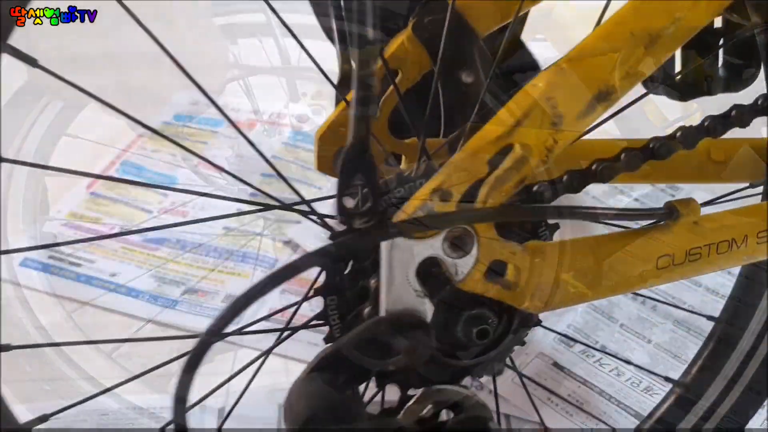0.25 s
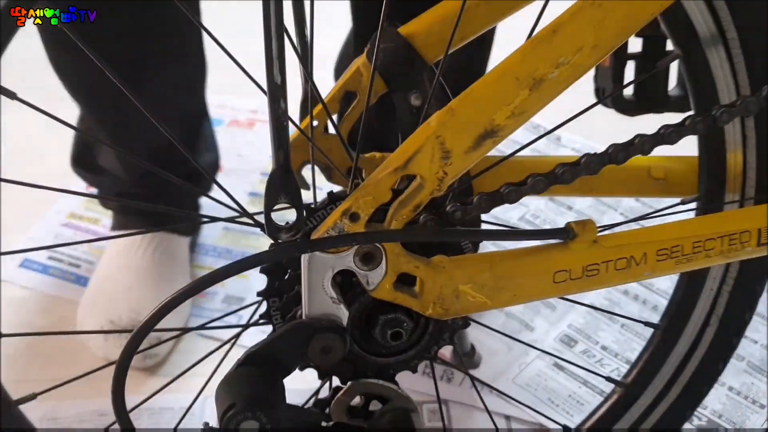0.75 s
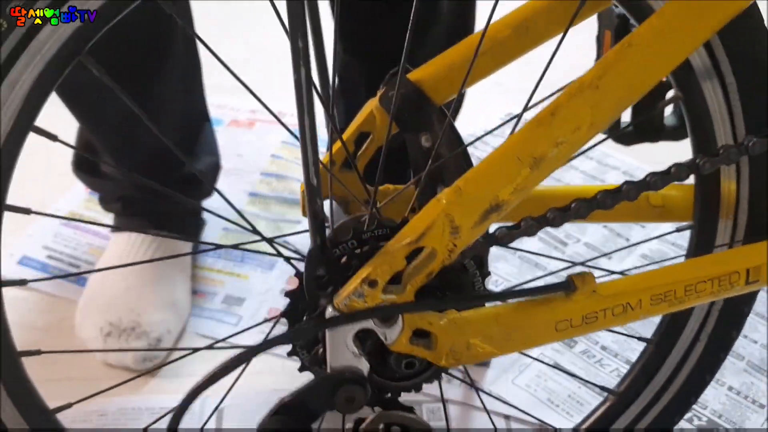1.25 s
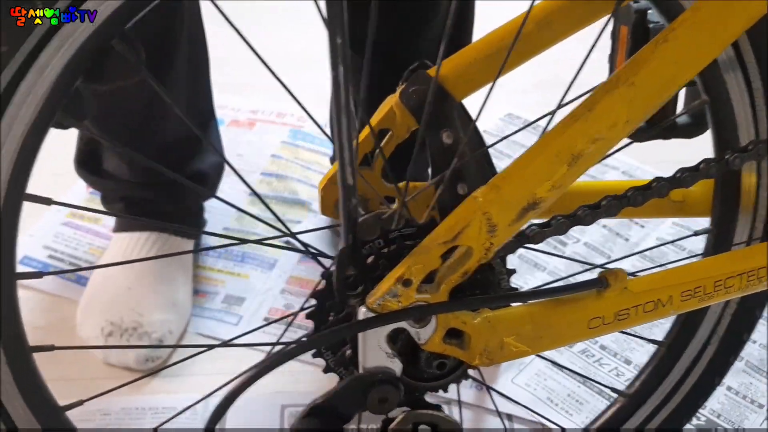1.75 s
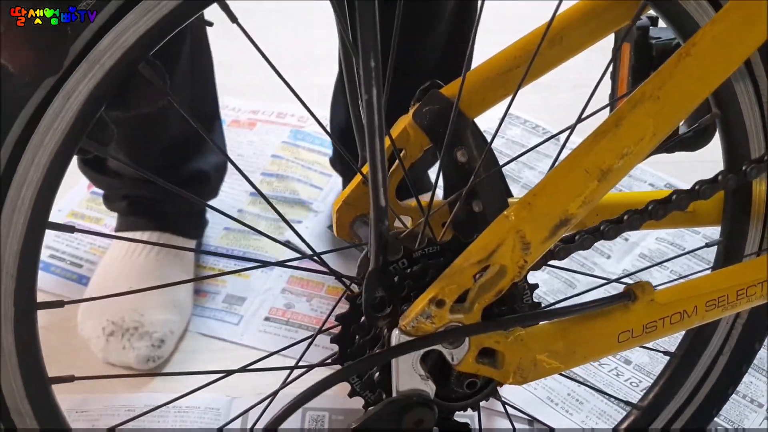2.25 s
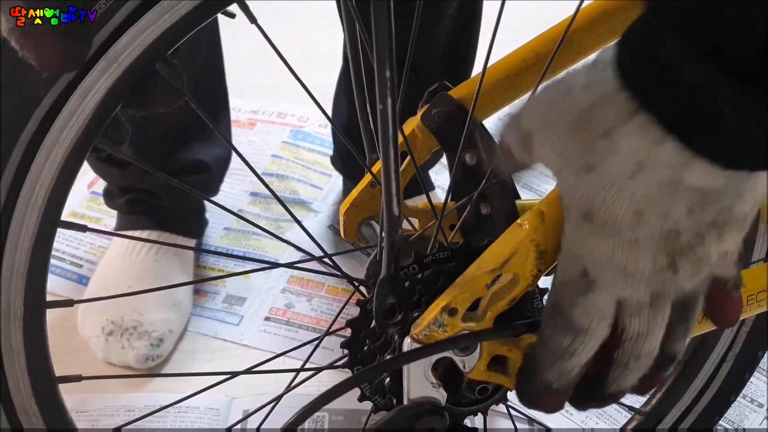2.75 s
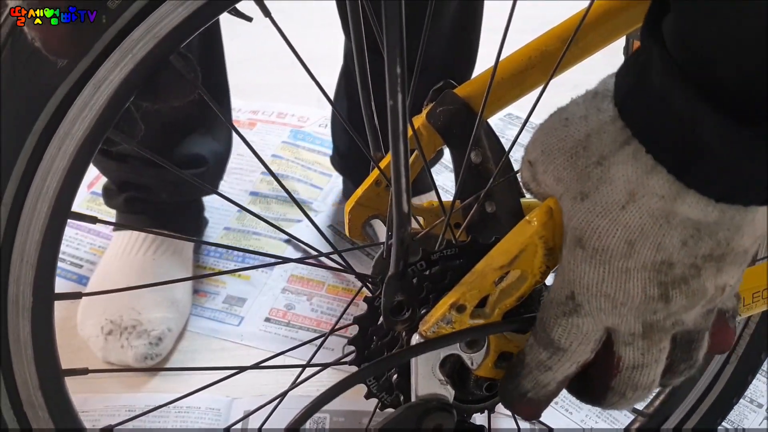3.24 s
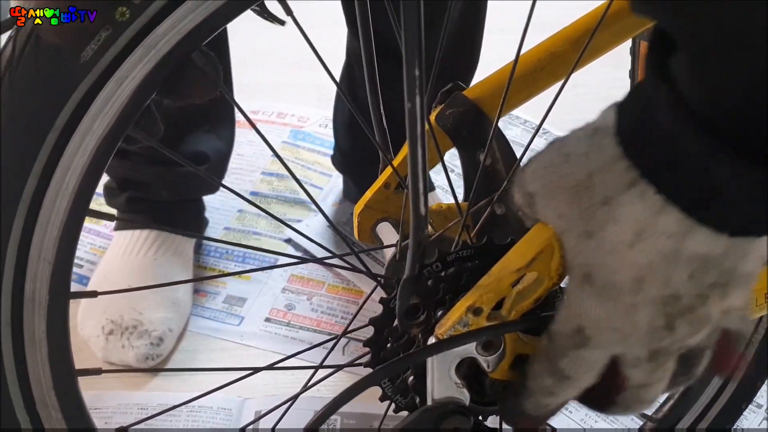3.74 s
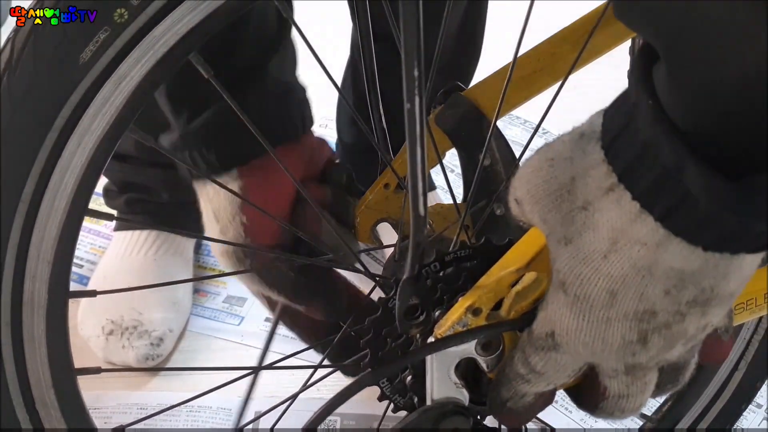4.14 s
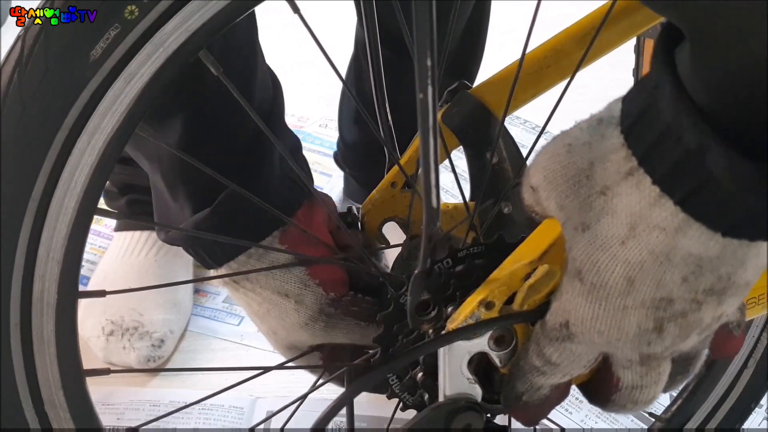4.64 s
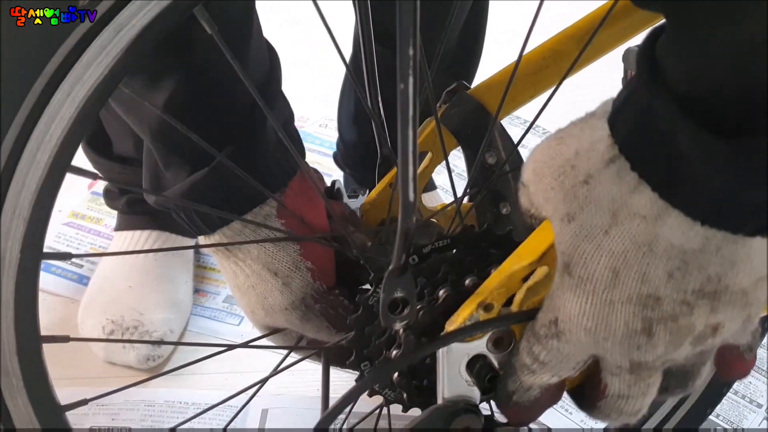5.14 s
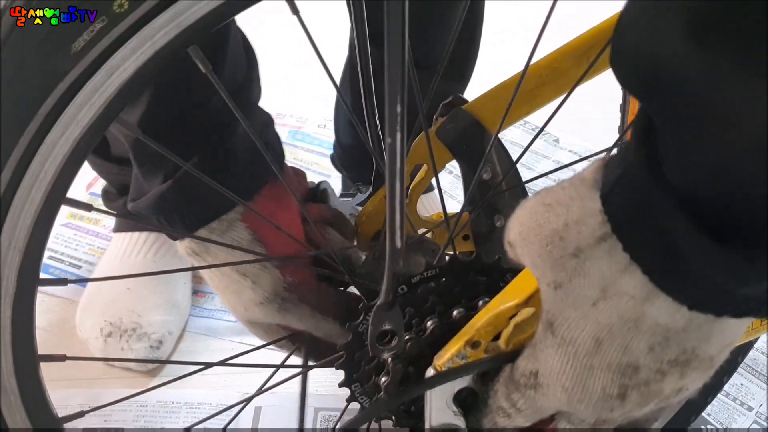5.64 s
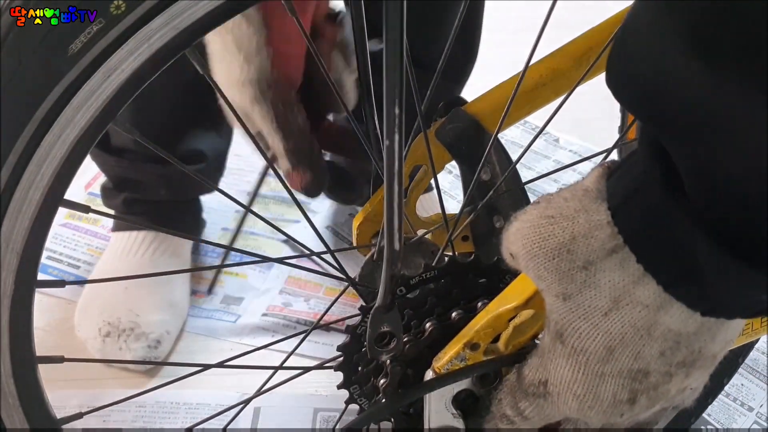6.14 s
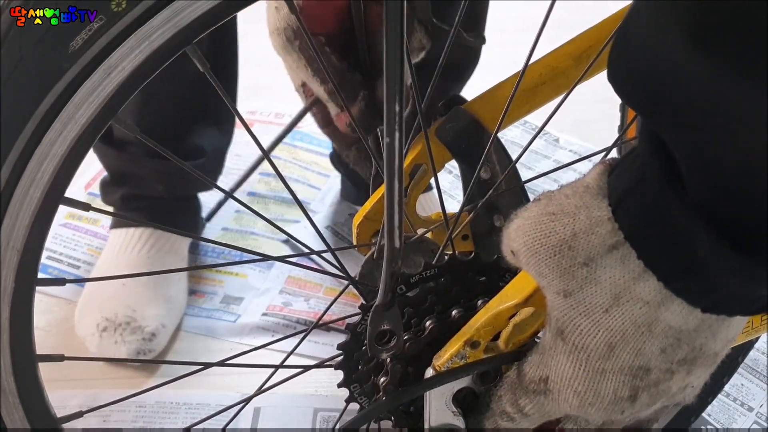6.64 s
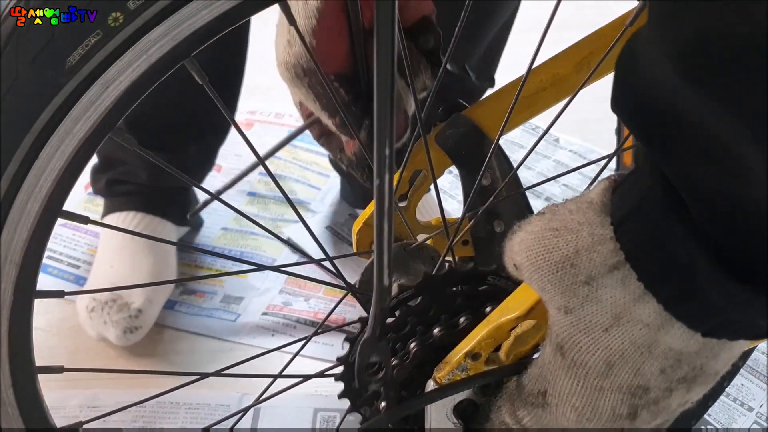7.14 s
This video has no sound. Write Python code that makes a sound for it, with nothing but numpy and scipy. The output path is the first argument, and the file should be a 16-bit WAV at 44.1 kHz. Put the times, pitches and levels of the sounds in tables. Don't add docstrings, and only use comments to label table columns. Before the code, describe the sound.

Close stereo microphone in a small, hard-floored, reverberant room. A sharp metal clack with a short squeak comes first, the loudest event. Then scattered small clicks, chain ticks and loose rattles over soft glove rubbing and dull tyre bumps. Around four and a half seconds a dull clunk and faint bell-like sprocket taps, then a bright snap past five seconds. It quietens, ending in light ticks.

```python
import sys
import numpy as np
from scipy import signal
from scipy.fft import rfft, irfft, next_fast_len
from scipy.io import wavfile

SR = 44100
rng = np.random.default_rng(int(sys.argv[2]) if len(sys.argv) > 2 else 0)


def int16_out(signal):
    q = np.round(np.clip(np.atleast_2d(signal).T, -1, 1) * 32767)
    wavfile.write(sys.argv[1], SR, q.astype(np.int16))


def ratio(d):
    e = np.asarray(d, float) / 20
    return 10 ** e


N = 325899
LONG = next_fast_len(N)

# t/s, level/dB, brightness/dB
FIDGET = [(0, -58.5, 4), (0.65, -68, -3), (0.73, -64.5, 2.5), (1.19, -72, 1.5), (1.63, -89.5, 10),
          (1.8, -58, 2), (2.2, -62.5, 1), (2.75, -65, -5), (3.15, -73, -4.5), (3.45, -65.5, -3),
          (3.85, -60, -5), (4.3, -69, 2), (5.68, -80.5, 1), (6.07, -67.5, -5), (6.4, -84, 5.5),
          (6.61, -71.5, -7.5), (6.9, -66, 0.5), (7.39, -70, -13.5)]
# t/s, peak/dB, attack/s, release/s, dullness/dB
STROKES = [(0.06, -54.5, 0.6, .3, -13), (0.2, -35, 0.06, 0.2, -6), (0.99, -52.5, 0.053, 0.16, -12),
           (1.09, -65, 0.042, 0.13, 9), (1.339, -56, 0.27, 0.6, -4.5), (1.54, -54.5, 0.066, 0.064, 7.5),
           (1.93, -54.5, 0.083, 0.29, -1), (2.9, -62, 0.22, 0.24, -14), (3.29, -58, .15, 0.25, -10),
           (4.545, -50, .02, .04, -20), (4.53, -56, 0.27, 0.35, 0.5), (4.65, -43.5, 0.18, 0.074, -16),
           (4.79, -48.5, 0.32, 0.28, -6), (4.87, -45, 0.14, 0.1, -0.5), (5.17, -57.5, 0.057, 0.64, 1),
           (5.319, -43.5, 0.046, 0.12, -7.5), (5.388, -37.5, 0.13, 0.13, -31), (5.52, -58, .2, 0.27, -28),
           (7.199, -56.5, 0.083, 0.38, -4.5)]
# f/Hz, density/dB per Hz
RUB_COLOUR = [(88, -32), (150, 1), (197, -6.5), (249, 0), (328, -2), (774, -2), (941, -5.5), (3620, -4.5),
              (7920, -17), (9260, -15), (12700, -19.5), (15100, -25), (16000, -34.5)]
# t/s, level/dB
RUMBLE = [(0, -72), (0.35, -68), (1.05, -82), (1.25, -75), (2.02, -68), (2.53, -73.5), (3.27, -76.5),
          (3.62, -66), (4.2, -75.5), (4.75, -71), (4.95, -80.5), (5.18, -69), (5.43, -59), (5.58, -81),
          (6.3, -73), (6.48, -78), (6.89, -71), (7.39, -76)]
# f/Hz, density/dB per Hz
RUMBLE_COLOUR = [(12, -52.5), (20, -19.5), (76, -4.5), (97, -11), (128, -23.5), (162, -20.5), (198, -29.5),
                 (311, -21.5), (400, -24), (520, -35), (880, -120)]
# f/Hz, density/dB per Hz
HISS_COLOUR = [(120, -39.5), (200, -5.5), (232, -6.5), (328, -11), (366, 0), (387, -17), (519, -19.5),
               (683, -7), (1150, -20.5), (1600, -12.5), (2150, -24.5), (5130, -28.5), (16000, -31.5)]
# f/Hz, likeness/0-1
LIKENESS = [(60, 1), (180, 1), (550, 0.54), (1650, 0.9), (4970, 0.08), (15000, 0.0)]
# t/s, peak/dB, f/Hz, sparkle/dB
TICKS = [(0.002, -40, 1950, -20), (0.459, -81, 5900, 21), (0.512, -59, 1130, -2), (0.857, -40, 3480, -35),
         (0.956, -44.5, 1030, -19), (1.729, -41.5, 1790, -17.5), (1.738, -69, 4500, -10),
         (1.829, -46, 1510, -14), (1.927, -36.5, 3630, -38), (2.245, -41, 2970, -15.5),
         (2.292, -39, 2570, -13), (2.303, -33.5, 2580, -18.5), (3.238, -46, 3480, -12),
         (3.249, -40, 5540, -21), (3.426, -41.5, 2310, -36), (3.537, -47, 3780, -14),
         (3.671, -36, 5260, -23), (3.743, -33.5, 3800, -19), (3.838, -39, 3060, -18.5),
         (4.433, -33, 1120, -4.5), (4.64, -34, 2340, -9.5), (5.265, -39, 2880, -36),
         (5.286, -38, 5070, -25.5), (5.325, -22, 2670, -15), (6.875, -39, 4950, -47),
         (7.14, -53.5, 4300, 2), (7.1585, -40, 5000, -1.5), (7.1657, -42, 5520, -2.5),
         (7.2695, -38, 5450, -2.5)]
# t/s, peak/dB, f/Hz, sparkle/dB, chatter t60/s
RATTLES = [(0.1405, -18, 2100, -12, 0.19), (0.995, -39.5, 1600, -36.5, 0.05),
           (1.308, -36, 900, -17.5, 0.044), (1.944, -34, 2420, -13.5, 0.26), (1.958, -29, 4860, -13.5, 0.1),
           (2.029, -30.5, 3460, -17, 0.028), (2.213, -45.5, 2240, -13, 0.19),
           (2.824, -39.5, 2810, -16, 0.13), (3.52, -33.5, 2360, -18.5, 0.6),
           (5.306, -33.5, 2220, -39, 0.06), (7.181, -35, 2000, -22.5, 0.08)]
# t/s, peak/dB, f/Hz, sparkle/dB
CLICKS = [(0.1425, -8.5, 2900, -23), (0.148, -13, 3700, -19), (1.039, -60.5, 1060, 6),
          (1.138, -44, 1620, -27), (1.418, -43, 1800, -39), (1.532, -33, 5600, -14),
          (1.773, -38.5, 2900, -13), (1.854, -39.5, 1540, -16), (2.007, -33.5, 2200, -30),
          (2.146, -45, 3870, -27), (2.192, -41, 3930, -20), (2.805, -46, 1700, -11),
          (2.95, -41.5, 1810, -32.5), (3.299, -52, 2360, -13), (3.595, -33, 2970, -16),
          (4.529, -34.5, 5040, -2), (4.715, -38, 1700, -5.5), (4.733, -29, 1910, -14.5),
          (5.157, -48, 1540, -22), (5.169, -34.5, 2750, -42), (5.353, -23.5, 2650, -11.5),
          (5.437, -29, 1740, -37), (5.76, -61, 1990, -10), (6.967, -54, 3590, -18)]
# t/s, peak/dB, f/Hz, sparkle/dB
KNOCKS = [(0.704, -47.5, 1500, -29.5), (1.068, -28.5, 1300, -12.5), (1.274, -43.5, 1470, -15),
          (1.516, -33, 695, -32), (3.199, -51, 3180, -31), (3.503, -24.5, 3360, -47),
          (4.86, -34.5, 686, -27), (4.874, -22.5, 2580, -16.5), (4.877, -39.5, 575, -38),
          (5.41, -36.5, 333, -42.5), (5.428, -40.5, 365, -43.5), (7.238, -48, 5600, -8)]
# t/s, peak/dB, f/Hz, sparkle/dB, chatter t60/s
JINGLES = [(3.506, -31, 1280, -16.5, 0.62), (4.336, -40.5, 1250, 1, 0.1), (4.337, -33.5, 6200, -30, 0.044),
           (4.565, -14.5, 2230, -49, 0.034), (4.568, -21, 1200, -37, 0.032), (4.722, -33, 1950, -34, 0.064),
           (6.419, -58, 5284, -15, .063), (7.076, -47.5, 5850, -11, 0.075),
           (7.186, -33.5, 1110, -41, 0.028), (7.264, -43, 4960, -0.6, 0.016)]
# t/s, level/dB
SQUEAKS = [
    [(0.04, -66), (0.048, -52), (0.078, -35), (0.11, -94)],
    [(0.53, -63), (0.59, -54.5), (0.622, -110), (0.66, -89.5)],
]
# f/Hz, width/Hz, level/dB
SQUEAK_PEAKS = [
    [(1300, 300, -9), (1950, 200, -2), (3700, 890, -2)],
    [(1205, 420, -1.5), (2500, 230, -1.5), (3300, 190, -1.5)],
]
# t/s, peak/dB, f/Hz, t60/s, puff/dB
BUMPS = [(0.142, -41, 106, 0.31, -12), (1.003, -29.5, 57.4, 0.3, -16), (1.295, -47.5, 82, 0.33, 4),
         (1.6, -46.5, 59.4, 0.23, -6.5), (1.908, -33, 58.6, 0.32, -9.5), (2.822, -44.5, 82, 0.33, -6.5),
         (3.185, -45, 88, 0.44, -10.5), (3.499, -34, 75.6, 0.47, -9), (4.452, -48, 45.8, 0.21, 0.5),
         (4.857, -38.5, 75.5, 0.34, -2.8), (5.37, -31.5, 50, 0.48, -9)]
# f/Hz, level/dB, t60/s
FRAME = [(544.8, -2.5, 0.21), (702, -6.5, 0.15), (860.3, -6.5, 0.081), (1030, -5, 0.09), (1140, -7, 0.088),
         (1350, -11, 0.066), (1860, -5, 0.04), (2240, -1.5, 0.028)]
# t/s, level/dB
FRAME_BLOWS = [
    (0.142, -31),
    (0.148, -28),
    (4.874, -42),
]
# t/s, peak/dB, f/Hz, t60/s
PINGS = [(0.1428, -14, 3150, .014), (0.148, -20, 3280, .03), (0.157, -25, 3350, .02),
         (0.398, -62, 9800, .008), (0.42, -62, 6500, .008), (0.508, -62, 11500, .008),
         (1.069, -40, 7500, .015), (1.072, -40, 1900, .02), (1.517, -43, 700, .08), (1.983, -44, 640, .06),
         (2.822, -48, 2400, .02), (2.835, -48, 3200, .012), (2.835, -52, 5800, .01),
         (3.21, -62, 11000, .008), (3.375, -60, 6500, .008), (3.513, -40, 3300, .012),
         (3.537, -42, 5000, .01), (4.336, -46, 8527, .1), (4.337, -46, 9453, .12), (4.348, -42, 6900, .03),
         (4.431, -42, 7000, .04), (4.462, -48, 4000, .03), (4.532, -42, 10400, .03),
         (4.548, -44, 9000, .02), (4.566, -33, 800, .04), (4.583, -36, 2450, .03), (4.615, -40, 2150, .05),
         (4.64, -44, 6700, .02), (4.665, -40, 2330, .04), (4.722, -40, 1900, .03), (4.733, -38, 1900, .05),
         (4.756, -46, 620, .06), (4.773, -44, 2000, .04), (4.874, -33, 545, .07), (4.887, -38, 700, .06),
         (5.265, -37, 2900, .009), (5.286, -40, 5150, .015), (5.306, -38, 3900, .006),
         (5.3255, -22, 2480, .009), (5.326, -25, 4000, .008), (5.355, -34, 2700, .015),
         (5.437, -34, 1750, .02), (6.875, -58, 1600, .02), (7.183, -44, 2000, .015)]
# t/s, peak/dB, f/Hz, t60/s, left-right/dB
THUNKS = [(1.003, -40, 260, .08, -20), (1.35, -50, 150, .1, 1), (1.511, -47, 223, .08, 1),
          (1.614, -50, 159, .1, .5), (1.864, -53, 130, .15, -8), (1.89, -54, 300, .1, -3),
          (1.935, -44, 170, .08, .5), (2.0, -52, 250, .1, 1), (2.18, -56, 260, .2, 1),
          (4.455, -43, 161, .12, .5), (4.463, -49, 480, .12, 1), (4.5, -48, 165, .1, .5),
          (4.505, -51, 310, .15, 1), (4.54, -53, 350, .1, 1), (1.308, -47, 620, .06, 1),
          (3.6, -52, 300, .1, 1), (4.717, -52, 196, .08, -.5), (4.863, -46, 245, .08, -.5),
          (5.354, -39, 290, .1, -13), (5.408, -46, 330, .06, -8), (5.426, -45, 390, .07, -8)]
# f/Hz, level/dB, t60/s
SPROCKET = [(605, -11, 0.43), (1114, -1, 0.13), (7720, -8, 0.06), (1620, -18, 0.2), (1873, -19, 0.25),
            (2700, -9, 0.12), (3420, -8, 0.08), (4600, -11, .1), (5600, -7, 0.07), (6700, -1, 0.05),
            (9141, -2, 0.05)]
# t/s, level/dB
SPROCKET_TAPS = [
    (4.336, -42),
    (4.431, -44.5),
    (4.529, -62),
    (4.64, -66),
    (4.715, -52),
]
# f/Hz, t60/s, level/dB
ROOM = [(99, 0.51, -5), (502.7, 0.36, -9), (1500, 0.46, -10), (4000, 0.27, -9.5), (8050, 0.31, -12.5),
        (15000, 0.33, -14.5)]
# f/Hz, width/Hz, share taken out/0-1
MICROPHONE_DIP = (7700, 380, 0.6)

# body/dB, crack share/0-1, rise/s, and chatter t60/s for the short kinds
KNOCK, CLICK, TICK = (-12, .3, .0009, .034), (-21.5, .4, .0011, .029), (-37.5, .3, .0013, .017)
RATTLE, JINGLE = (-16.5, .5, .0012), (-39, .45, .0009)
PAN_DB, PAN_PER_DB, PAN_KNEE_DB = 2.05, .25, -63.5
BUMP_PAN_DB, JOLT_DB, JOLT_PAN_PER_DB = 2.8, -35.5, 4
FIDGET_DULL_DB, STROKE_BRIGHT_DB, TREBLE_FADES_FASTER = -5, -3.5, 1.35


def rms_one(x):
    return x / np.sqrt(np.mean(x ** 2) + 1e-20)


def in_time(rows):
    s, *columns = np.transpose(rows)
    return [np.interp(np.arange(N) / SR, s, c) for c in columns]


def at_hz(points, hz, axis=1):
    points = np.array(points)
    return np.interp(np.log(np.maximum(hz, 1)), np.log(points[:, 0]), points[:, axis])


def band(x, low_hz, high_hz):
    sos = signal.butter(2, [low_hz, min(high_hz, .45 * SR)], "band", fs=SR, output="sos")
    return signal.sosfilt(sos, x)


def resonance(x, hz, width_hz):
    r = np.exp(-np.pi * width_hz / SR)
    poles = [1, -2 * r * np.cos(2 * np.pi * hz / SR), r * r]
    return signal.lfilter([(1 - r * r) / 2, 0, (r * r - 1) / 2], poles, x)


def drift(rate_hz):
    r = np.exp(-80 * np.pi * rate_hz / SR)
    slow = signal.lfilter([1], [1, -2 * r, r * r], rng.standard_normal(N // 40 + 2002))[2000:]
    return np.interp(np.arange(N) / 40, np.arange(len(slow)), rms_one(slow))


def sides(db):
    return ratio(np.array([db / 2, -db / 2]))


def white_pair(spread_db=0):
    return rfft(rng.standard_normal((2, LONG)) * ratio(spread_db * rng.standard_normal(LONG)))


def coloured(white, spectrum, share=lambda hz: 1):
    hz = np.fft.rfftfreq(LONG, 1 / SR)
    alike = np.clip(at_hz(LIKENESS, hz) - .4, 0, 1)
    mid, side = white * ratio(at_hz(spectrum, hz)) * share(hz)
    mid, side = np.sqrt(1 + alike) * mid, np.sqrt(1 - alike) * side
    return rms_one(irfft([mid + side, mid - side], LONG)[:, :N])


def effort():
    step = 32
    t = np.arange(0, N + step, step) / SR
    s, *columns = np.transpose(FIDGET)
    level_db, bright_db = [np.interp(t, s, c) for c in columns]
    rub = ratio(2 * level_db)
    dull = ratio(2 * (level_db + FIDGET_DULL_DB))
    bright = ratio(2 * (level_db + bright_db))
    for s, db, attack_s, release_s, dull_db in STROKES:
        fade_db = 20 * np.maximum((s - t) / attack_s, (t - s) / release_s)
        power = ratio(2 * (db - fade_db))
        rub = rub + power
        dull = dull + power * ratio(2 * dull_db)
        bright = bright + ratio(2 * (db + STROKE_BRIGHT_DB - TREBLE_FADES_FASTER * fade_db))
    rub_db, dull_db, bright_db = [np.interp(np.arange(N) / SR, t, 10 * np.log10(p)) for p in (rub, dull, bright)]
    pan_db = PAN_DB + PAN_PER_DB * np.maximum(PAN_KNEE_DB - rub_db, 0)
    return rub_db, dull_db, bright_db, pan_db


def hands(rub_db, dull_db, bright_db, pan_db):
    grains = white_pair(spread_db=5.2)
    # f/Hz, shares of the dull, middle and bright registers
    blends = [(600, 1, 0, 0), (1600, 0, 1, 0), (4000, 0, 1, 0), (7500, 0, 0, 1)]
    out = 0
    for column, level_db in ((1, dull_db), (2, rub_db), (3, bright_db)):
        register = coloured(grains, RUB_COLOUR, lambda hz: at_hz(blends, hz, axis=column))
        out = out + ratio(level_db - 4.5) * register
    return out * ratio(2.2 * drift(13)) * sides(pan_db)


def floor_rumble():
    return coloured(white_pair(), RUMBLE_COLOUR) * ratio(in_time(RUMBLE)[0] + 7.5)


def steady_hiss():
    return coloured(white_pair(), HISS_COLOUR) * ratio(-78)


def contact_rows():
    rows = []
    for table, kind in ((KNOCKS, KNOCK), (CLICKS, CLICK), (TICKS, TICK)):
        rows += [(*row, *kind) for row in table]
    for table, kind in ((RATTLES, RATTLE), (JINGLES, JINGLE)):
        rows += [(*row[:-1], *kind, row[-1]) for row in table]
    return rows


def contacts(pan_db):
    size, rows = 6144, contact_rows()
    t, out = np.arange(size) / SR, np.zeros((2, N + size))
    grit = rng.standard_normal((len(rows), 3, size)) * ratio(5 * rng.standard_normal((len(rows), 1, size)))
    after = ratio(-23 - 60 * t / .1)
    grit[:, 0, 24] += 14
    for (s, peak_db, hz, sparkle_db, body_db, crack, rise_s, t60), g in zip(rows, grit):
        at = round(s * SR)
        dying = (ratio(-60 * t / np.clip(.98 * t60, .003, .3)) + after) * np.minimum(t / rise_s, 1)
        shake = (g[0] + .9 * g[1:]) * dying
        fine = (g[0] + 3.2 * g[1:]) * dying
        core = resonance(resonance(shake, hz, .43 * hz), hz, .43 * hz)
        core += crack * min(hz / 1250, 1) ** 2 * band(shake, 1050, 6500)
        body = band(band(shake, 443, 1100), 370, 1400)
        sparkle = band(band(fine, 6200, 14300), 7100, 21000)
        hit = core / np.abs(core).max()
        hit += ratio(body_db + 7) * body / np.abs(body).max()
        hit += ratio(sparkle_db + 14) * sparkle / np.abs(sparkle).max()
        out[:, at:at + size] += ratio(peak_db - 2) * hit * sides(pan_db[at])[:, None]
    return out[:, :N]


def squeaks():
    out = 0
    for curve, peaks in zip(SQUEAKS, SQUEAK_PEAKS):
        start, end = (curve[0][0] - .005, -120), (curve[-1][0] + .005, -120)
        level_db, = in_time([start] + list(curve) + [end])
        slip = rng.standard_normal((2, N))
        squeal = sum(ratio(db) * resonance(slip, hz, width_hz) for hz, width_hz, db in peaks)
        out = out + ratio(level_db - 3.5) * rms_one(squeal)
    return out


def bumps():
    size = 22050
    t, out = np.arange(size) / SR, np.zeros((2, N + size))
    for (s, peak_db, hz, t60, puff_db), g in zip(BUMPS, rng.standard_normal((len(BUMPS), size))):
        ring = np.sin(2 * np.pi * .95 * hz * (t + .0028 * (1 - np.exp(-t / .024))))
        ring *= np.minimum(t / .0047, 1) * ratio(-60 * (t / np.clip(t60, .03, .6)) ** 1.07)
        puff = ratio(-60 * t / .44) * rms_one(band(g, 110, 190))
        puff += 1.8 * ratio(-60 * t / .2) * rms_one(band(g, 220, 380))
        puff *= ratio(puff_db) * np.minimum(t / .0096, 1)
        pan_db = BUMP_PAN_DB - JOLT_PAN_PER_DB * max(peak_db - JOLT_DB, 0)
        out[:, round(s * SR):][:, :size] += ratio(peak_db - 10) * (ring + puff) * sides(pan_db)[:, None]
    return out[:, :N]


def struck(modes, blows, longest_s):
    size = SR // 2
    t, out = np.arange(size) / SR, np.zeros((2, N + size))
    pairs = [(hz * twin, db - 4.5, t60) for hz, db, t60 in modes for twin in (1, 1.013)]
    for hz, level_db, t60 in pairs:
        chance = rng.standard_normal((len(blows), 3))
        strength = ratio(np.array(blows)[:, 1] + level_db + 2.5 * chance[:, 0])
        gains = strength * np.sign(chance[:, 1:].T + 2500 / hz)
        ring = np.sin(2 * np.pi * hz * t) * ratio(-60 * t / min(t60, longest_s))
        for (s, _), gain in zip(blows, gains.T):
            out[:, round(s * SR):][:, :size] += gain[:, None] * ring
    return out[:, :N]


def frame_ring():
    return struck(FRAME, FRAME_BLOWS, longest_s=.19)


def swelling_notes(rows, rise_cycles):
    size = 5292
    t, out = np.arange(size) / SR, np.zeros((2, N + size))
    for s, peak_db, hz, t60, pan_db in rows:
        twin = np.sin(2 * np.pi * hz * 1.06 * t) * [[1], [-.3]]
        note = np.sin(2 * np.pi * hz * t) + .4 * twin
        note *= np.minimum(t * hz / rise_cycles, 1) * ratio(peak_db - 60 * t / np.clip(t60, .003, .3))
        out[:, round(s * SR):][:, :size] += note * sides(pan_db)[:, None]
    return out[:, :N]


def pings():
    return swelling_notes([(*row, PAN_DB) for row in PINGS], rise_cycles=2.5)


def thunks():
    return swelling_notes(THUNKS, rise_cycles=1.2)


def sprocket_ring():
    return struck(SPROCKET, SPROCKET_TAPS, longest_s=.45)


def room(x):
    size = SR
    t, edges = np.arange(size) / SR, 80 * 2 ** np.arange(0, 8.1, 1)
    tail, white = 0, rng.standard_normal((3, size))
    white = white[1:] + .66 * white[0]
    for low, high in zip(edges, edges[1:]):
        hz = np.sqrt(low * high)
        t60 = at_hz(ROOM, hz)
        fade = ratio(at_hz(ROOM, hz, axis=2) - 60 * t / t60)
        tail = tail + band(white, low, high) * fade / np.sqrt(SR * t60 / 14)
    tail *= np.clip((t - .003) / .0018, 0, 1)
    return signal.fftconvolve(x, tail, axes=1)[:, :N]


def scene():
    rub_db, dull_db, bright_db, pan_db = effort()
    knocks = contacts(pan_db) + frame_ring() + sprocket_ring() + squeaks()
    notes = pings()
    knocks[0] = np.roll(knocks[0], 2)
    rumble, hiss = floor_rumble(), steady_hiss()
    walls = ratio(10.5) * room(knocks + .3 * notes)
    rubbing = hands(rub_db, dull_db, bright_db, pan_db)
    return knocks + notes + walls + rubbing + bumps() + thunks() + rumble + hiss


def roll_off(x):
    return signal.sosfilt(signal.butter(12, 16400, fs=SR, output="sos"), x)


def record(dry):
    hz, width_hz, share = MICROPHONE_DIP
    heard = dry - np.clip(share, 0, 1) * resonance(dry, hz, width_hz)
    heard = signal.sosfilt(signal.butter(14, 15000, fs=SR, output="sos"), heard)
    heard = signal.sosfilt(signal.butter(2, 32, "high", fs=SR, output="sos"), heard)
    return roll_off(heard)


dry = scene()
out = record(dry)
int16_out(out)
```